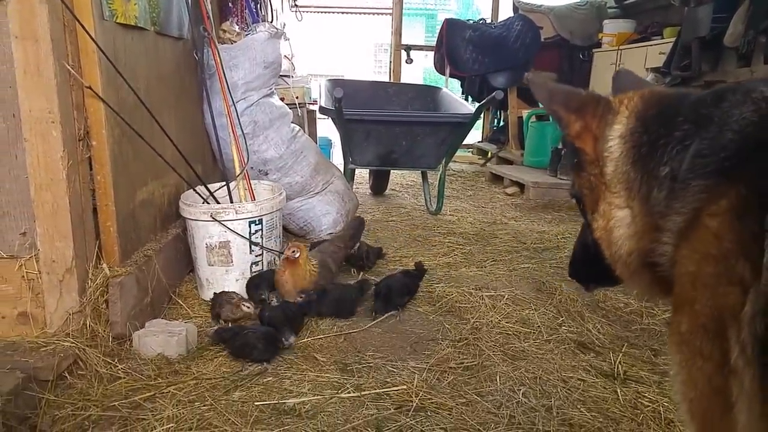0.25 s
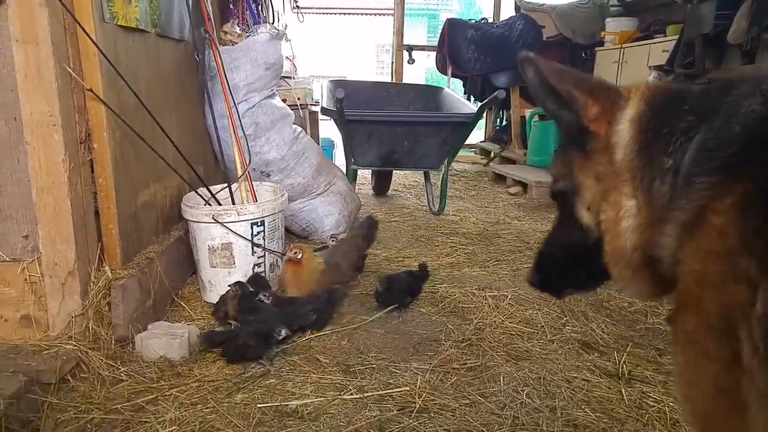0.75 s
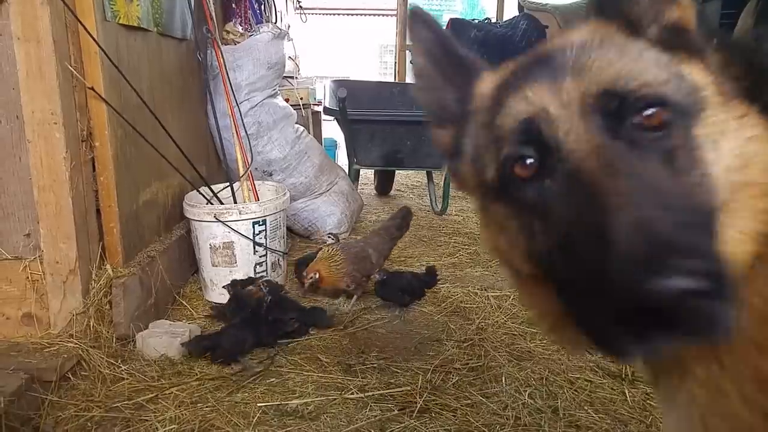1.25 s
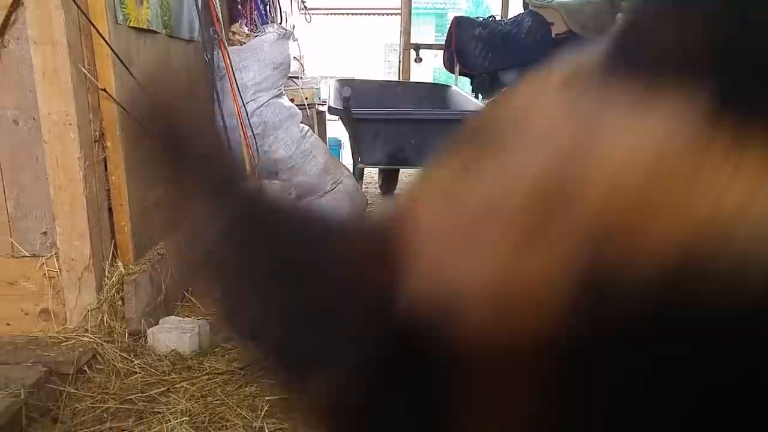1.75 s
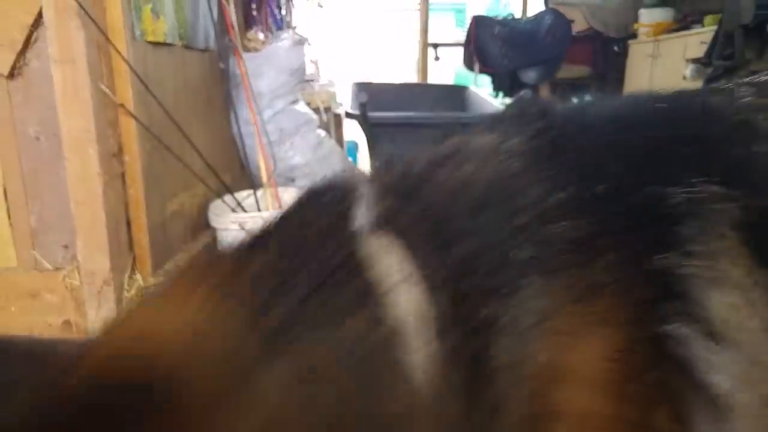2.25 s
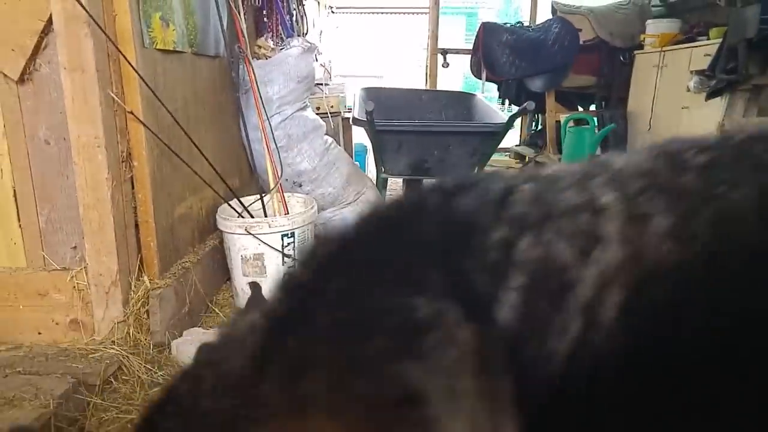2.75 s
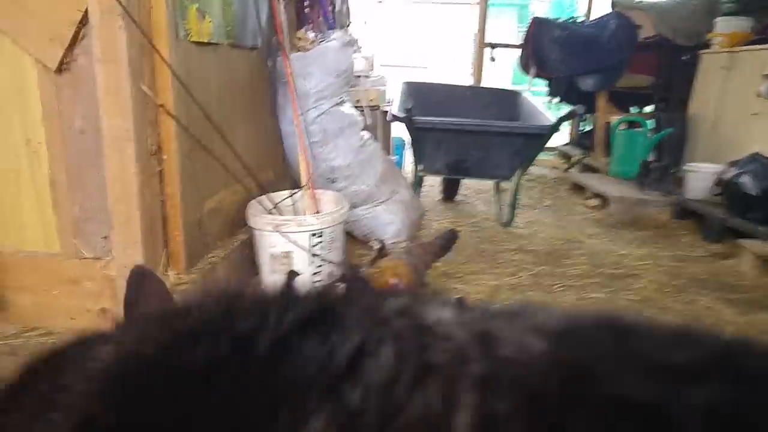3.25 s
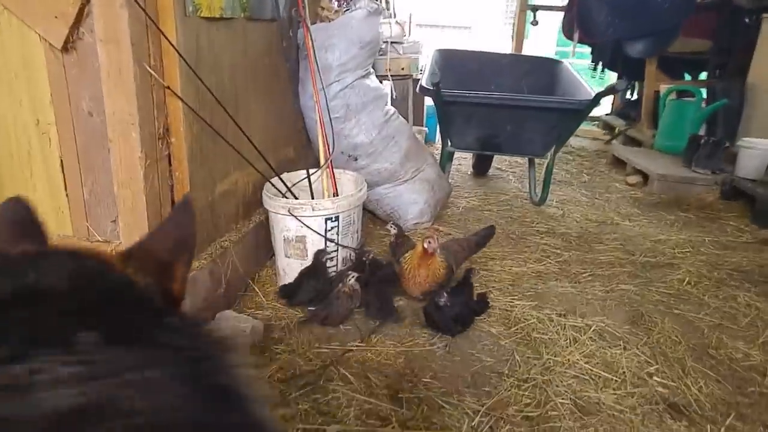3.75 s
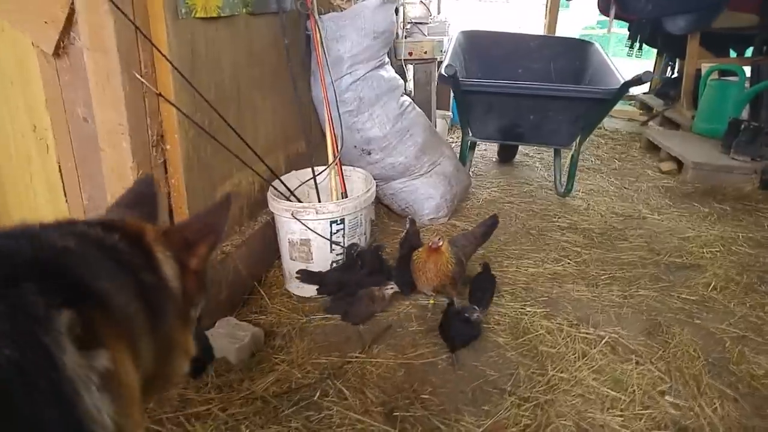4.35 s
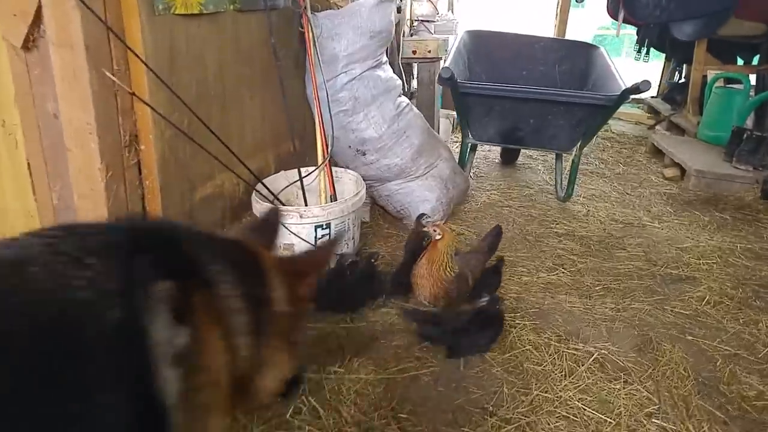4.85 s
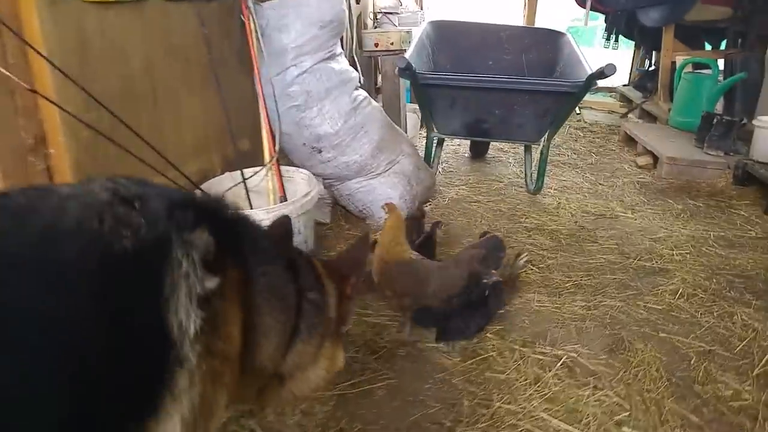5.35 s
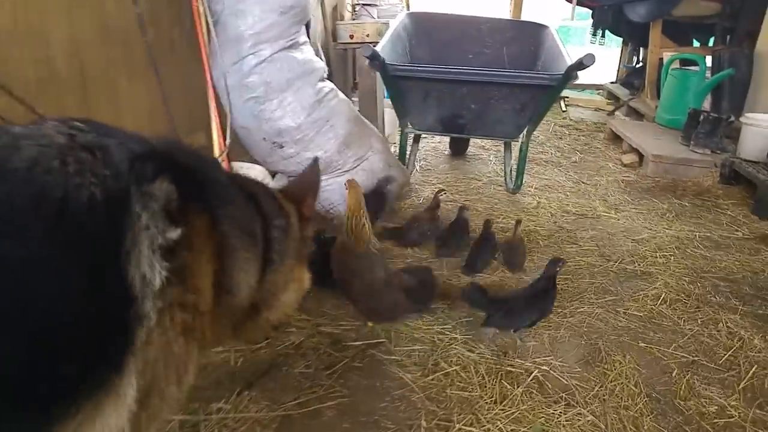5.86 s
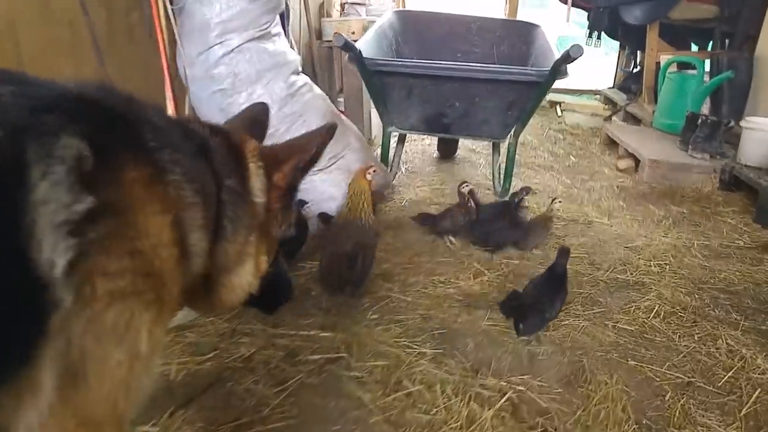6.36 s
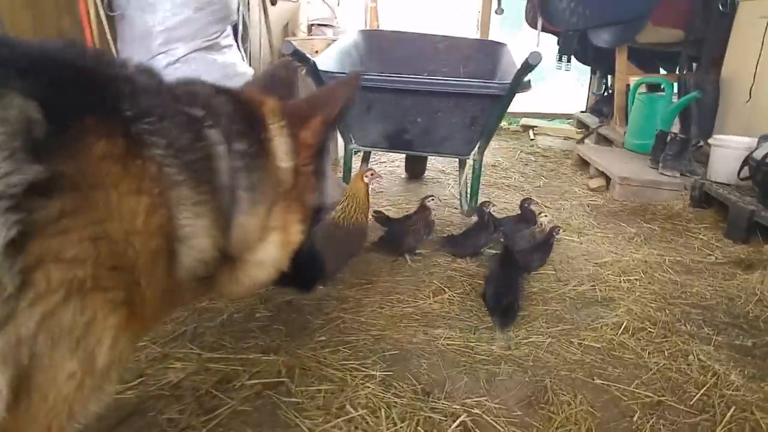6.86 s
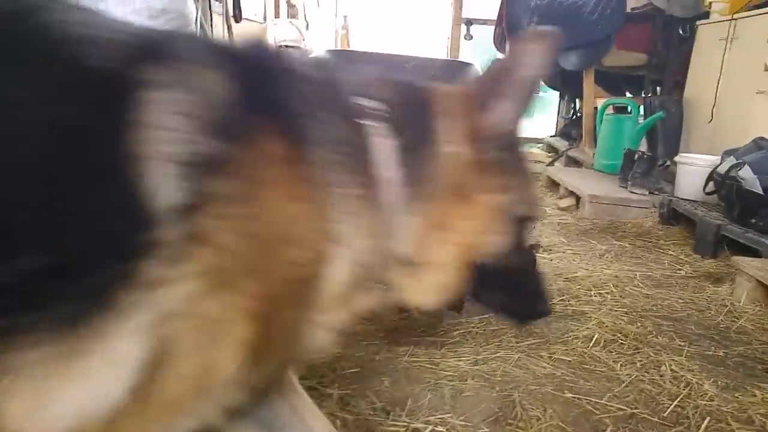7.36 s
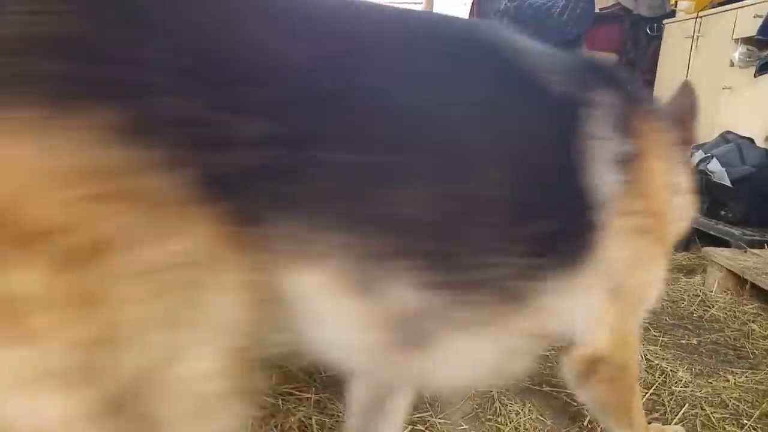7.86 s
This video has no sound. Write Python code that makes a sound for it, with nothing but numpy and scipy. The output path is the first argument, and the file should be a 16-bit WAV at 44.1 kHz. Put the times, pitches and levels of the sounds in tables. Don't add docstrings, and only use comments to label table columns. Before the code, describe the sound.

Thin down-bending chick whistles, crackling straw and handling knocks, a distant rough crow midway, then throaty hen clucks, startled squawks and a faint growl.

```python
import sys
import numpy as np
from scipy import signal
from scipy.fft import rfft, irfft
from scipy.io import wavfile

SR = 44100
rng = np.random.default_rng(int(sys.argv[2]) if len(sys.argv) > 2 else 0)


def invert_db(x):
    u = np.asarray(x, float) / 20
    return 10 ** u


def output_pcm(signal):
    pcm = np.clip(np.atleast_2d(signal).T, -1, 1) * 32767
    wavfile.write(sys.argv[1], SR, np.round(pcm).astype(np.int16))


N = 357210

SIDE_LEAD = 42
SHED_T60_S, YARD_T60_S = 0.17, 0.5

# time in seconds, level in dB.
AIR_LEVEL = [
    (0.0, -63),
    (5.3, -58.5),
    (8.1, -58.5),
]
# frequency in Hz, level in dB per Hz.
AIR_COLOUR = [(36, 6.5), (70, 2), (170, -4.5), (600, 3.5), (1600, -13), (2600, -7.5), (7000, -17.5),
              (14000, -31)]
# frequency in Hz, shared part from 0 to 1.
AIR_SHARED = [(60, 0.69), (500, 0.067), (1500, 0.034), (5000, 0.056), (12000, 0.64)]
# frequency in Hz, left minus right in dB.
AIR_PAN = [(60, -9.5), (240, -0.5), (950, 0.5), (3770, -7.5), (15000, 2)]
# time in seconds, level in dB.
SCRATCHING = [(0, -66), (.6, -60.5), (1.1, -59.5), (1.95, -57), (2.15, -63), (2.7, -61), (3.6, -56),
              (4.5, -56.5), (5.5, -57.5), (6.1, -52), (6.5, -60.5), (7.5, -59), (8.1, -59.5)]
# time of the peak in seconds, level in dB, dying time in seconds.
STEPS = [(1.24, -44.5, 0.03), (1.52, -52.5, 0.069), (1.79, -50.5, 0.044), (3.3, -55.5, 0.037),
         (3.43, -51, 0.11), (4.031, -53, 0.047), (4.48, -56, 0.078), (4.56, -55, 0.089),
         (4.76, -52.5, 0.057), (5.08, -59, 0.056), (5.64, -48, 0.12), (5.92, -50.5, 0.093),
         (7.019, -49.5, 0.026), (7.141, -50.5, 0.11), (7.25, -61, 0.029), (7.365, -59, 0.04),
         (7.4, -49, 0.045), (7.49, -54.5, 0.044), (7.87, -58, 0.19), (7.72, -51.5, 0.048),
         (8.05, -55.5, 0.27)]
# frequency in Hz, level in dB per Hz.
STRAW_COLOUR = [(1500, -7.5), (2750, -7), (3340, -5.5), (4890, 0.5), (7090, 4.5), (10000, -4), (14200, -5),
                (15300, -23.5)]
# time in seconds, lead of the left port in samples, left minus right in dB.
BROOD_PLACE = [
    (0, 32.6, -10.5),
    (2.7, 37, -7.5),
    (3.1, 4.9, -7),
    (5.5, 12.16, -0.5),
    (8.1, 8, 6),
]
# start in seconds, length in seconds, top pitch in Hz, end pitch
# in Hz, level in dB.
PEEPS = [(.095, 0.076, 5300, 3700, -50.5), (.12, 0.04, 4160, 3330, -50.5), (.205, 0.041, 4260, 4000, -52.5),
         (.225, 0.071, 5820, 5930, -55), (.315, 0.028, 5140, 5040, -54.5), (.34, 0.048, 5600, 5250, -60),
         (.365, .055, 4950, 4370, -53), (.338, 0.045, 4390, 3540, -51), (.43, 0.049, 4400, 3000, -47.5),
         (.432, 0.028, 4740, 4180, -48.5), (.52, 0.063, 4420, 4220, -49), (.515, 0.068, 4230, 3830, -55),
         (.562, 0.059, 4500, 2870, -43), (.56, .035, 5170, 4970, -57), (.568, 0.039, 4800, 4300, -47.5),
         (.742, 0.066, 4460, 2890, -46.5), (.745, 0.042, 4730, 4250, -48), (1.008, 0.036, 3680, 2650, -64),
         (1.054, 0.038, 3740, 2650, -51.5), (1.165, 0.046, 5060, 4030, -56), (1.185, 0.04, 3870, 3030, -50),
         (1.305, 0.046, 4320, 3080, -45), (1.32, 0.032, 5250, 5170, -50), (1.39, 0.035, 4660, 3630, -46.5),
         (1.435, 0.022, 4410, 4120, -53), (1.45, 0.062, 4190, 3800, -48), (1.455, 0.022, 4670, 4540, -52),
         (1.535, 0.075, 4830, 3000, -47.5), (1.615, 0.044, 5050, 4950, -54),
         (1.615, 0.05, 4420, 3610, -49.5), (1.7, 0.032, 4300, 3900, -51.5),
         (1.785, 0.045, 5130, 5040, -52.5), (1.79, 0.07, 4240, 3760, -54.5),
         (1.86, 0.042, 4580, 4180, -51.5), (1.865, 0.042, 4170, 4020, -53),
         (1.925, 0.0071, 3370, 3030, -50.5), (2.02, 0.11, 4530, 3400, -58), (2.035, 0.057, 5360, 4500, -55),
         (2.18, 0.072, 4690, 3720, -54),
         (2.236, 0.021, 3060, 3080, -52), (2.317, 0.077, 4690, 3150, -49),
               (2.484, 0.054, 4060, 3570, -53), (2.5, 0.032, 4280, 4000, -52),
               (2.643, .055, 4200, 3710, -47.5), (2.656, 0.078, 4400, 3170, -55.5),
               (2.665, 0.031, 3600, 2900, -61), (2.839, 0.027, 3700, 3050, -52),
               (2.844, .088, 4110, 3020, -50), (3.319, 0.042, 4850, 4000, -45.5),
               (3.447, .045, 4950, 3950, -47), (3.756, .055, 4250, 3850, -45),
               (3.92, 0.034, 3880, 3560, -49), (3.954, 0.047, 5070, 4000, -46),
               (3.943, 0.038, 4310, 3830, -42.5), (4.01, 0.038, 4210, 4070, -51),
               (4.128, 0.072, 4370, 3930, -44), (4.15, 0.033, 5080, 4300, -52),
               (4.265, 0.042, 4790, 4600, -52), (5.63, 0.023, 3760, 3400, -49),
               (5.771, 0.0084, 3960, 4060, -50), (5.81, 0.0095, 4050, 3930, -43.5),
               (5.812, 0.017, 3670, 2830, -45), (5.888, 0.053, 4010, 3870, -55),
               (5.896, 0.035, 4010, 2270, -42), (8.022, 0.042, 4150, 3200, -46.5)]
# start in seconds, length
# in seconds, top pitch in Hz, end pitch in Hz, level in dB.
SHAKY_PEEPS = [(6.432, 0.0178, 3400, 2860, -55), (6.62, 0.016, 3300, 3000, -53),
               (6.65, 0.037, 4350, 4500, -54), (6.76, 0.039, 3950, 3880, -59),
               (6.51, 0.062, 4500, 3100, -56), (6.55, 0.024, 4550, 4400, -45.5),
               (6.575, .035, 4350, 3660, -53), (6.622, 0.027, 3800, 2700, -51),
               (6.675, 0.041, 4650, 3480, -51), (6.76, 0.059, 4250, 4160, -54.5),
               (6.785, 0.046, 5150, 4060, -55), (6.836, 0.033, 3750, 2820, -46),
               (7.87, .05, 5430, 5100, -54.5), (7.95, .045, 4140, 3860, -50),
               (6.94, 0.05, 4250, 4080, -52.5), (7.01, 0.029, 4300, 3700, -61),
               (7.2, 0.054, 3600, 3000, -60), (7.265, 0.035, 4550, 4150, -50.5),
               (7.27, 0.046, 4850, 3460, -49), (7.275, 0.037, 3650, 3010, -50),
               (7.46, .03, 5250, 5200, -57), (7.475, 0.032, 4500, 3720, -52),
               (7.515, 0.021, 3600, 2820, -46), (7.73, 0.017, 3700, 3680, -50),
               (7.74, 0.019, 3100, 2720, -49),
               (1.012, 0.027, 3680, 2710, -49.5), (1.058, 0.032, 3800, 2780, -50),
                 (4.52, 0.042, 4100, 3200, -48.5), (4.594, 0.041, 4250, 3100, -50),
                 (4.658, 0.05, 4600, 3600, -51), (4.666, 0.022, 3850, 3700, -48.5),
                 (4.7, .045, 4300, 4100, -52), (4.72, 0.02, 3300, 2850, -51),
                 (4.795, 0.044, 4250, 3200, -46.5), (4.802, 0.055, 5150, 4400, -50.5),
                 (4.814, 0.067, 4500, 3900, -53), (4.854, 0.03, 5100, 4400, -56),
                 (4.86, 0.064, 4150, 3600, -51), (4.882, .03, 3300, 2750, -55),
                 (4.982, .025, 4900, 3760, -54), (5.009, 0.03, 3500, 2600, -50.5)]
# start in seconds, peak level in dB, thump level in dB, brightness in dB per octave.
KNOCKS = [(.213, -49, 7, -12), (.431, -43, 7, 1), (0.936, -49, 7, 1), (1.657, -26.5, -28, 2),
          (1.742, -33.5, 0, 1.5), (2.123, -50, 13, -1), (2.159, -39.5, -6, 4), (3.95, -36, 1, 1.5),
          (4.377, -34.5, -23, 6), (4.485, -39, 9, 18), (4.622, -43, 5, 2), (4.74, -35.5, 5.5, 6),
          (5.308, -29, -40, -1), (5.431, -36, 8.5, 7), (7.36, -41, -27, -5), (7.719, -34, 8, 1.5),
          (7.803, -27, -5.5, -6.5), (7.923, -38.5, 0, 0)]
# start in seconds, peak level in dB, thump level in dB, brightness in dB per octave.
PAWS = [(2.039, -49, -16, -3), (2.349, -51.5, 14, -12), (2.802, -38.5, -2, -13), (2.839, -48, 11, 8),
        (2.918, -50, -12, 12), (3.534, -50.5, -16, -1), (4.91, -49.5, -2, 4), (5.271, -48, -9, 4),
        (3.717, -46.5, -23, -6)]
# pitch in Hz, level in dB, time to fall 60 dB in seconds.
CASING = [(400, -3, 0.014), (688, 9.5, 0.012), (1320, 5.5, 0.0058), (2370, 0, 0.0043), (4000, -7.5, 0.0066)]
# start in seconds, length in seconds, start pitch in Hz, level in dB.
YARD_CALLS = [(0.36, 0.066, 2685, -69.5), (0.704, 0.05, 2630, -66), (.77, 0.017, 2430, -64),
              (6.448, 0.037, 2350, -77), (1.117, 0.09, 1897, -66), (1.365, 0.2, 2743, -61),
              (1.486, 0.033, 3030, -70), (1.799, 0.31, 2120, -65), (2.108, 0.2, 2790, -60),
              (2.474, 0.22, 2300, -68), (2.69, 0.061, 1600, -72), (5.06, 0.041, 2630, -66)]
# start in seconds, peak level in dB, left minus right in dB.
SNAPS = [(0.8859, -54, -4.5), (1.244, -30, 6), (1.8956, -39, -1.5), (1.9926, -31, -6), (2.2416, -33.5, -6),
         (2.2657, -40, -5), (2.367, -32, 4), (2.4652, -31, -6), (2.513, -30, -4), (3.4118, -27, -2.0),
         (3.6005, -33.5, -5.0), (3.715, -42, -5.5), (4.7433, -40, 0.5), (5.41, -37, 3), (5.5543, -34, 5),
         (5.8197, -33, 2.0), (5.911, -29, 5), (6.997, -33, -6), (7.1365, -29, 9), (7.3637, -34, 1),
         (7.3983, -37, 10), (7.4953, -36, 4), (7.7039, -42, 6.5), (7.9234, -24.5, 19), (7.974, -31, 11),
         (1.39, -51, -3), (1.955, -36, -5), (8.018, -42, 3)]
# time in seconds, level in dB.
SCREECH_LEVEL = [(2.76, -46.5), (2.95, -55.5), (3.5, -41.5), (3.82, -35.5), (3.971, -48.5), (4.04, -41.5),
                 (4.17, -38.5), (4.399, -51.5)]
# frequency in Hz, width in Hz, level in dB.
SCREECH_BANDS = [(2100, 680, -5.5), (2570, 160, -9.5), (3720, 1300, -1), (4950, 770, -3),
                 (5250, 300, -11.5), (3525, 120, -24)]
# time in seconds, pitch in Hz, level in dB, hoarseness from 0 to 1.
CROW = [
    [(3.02, 1192, -47, 0), (3.08, 1265, -44.5, 0.27), (3.17, 1266, -44, 0.61), (3.3, 1320, -56, 0.9),
     (3.45, 1370, -43.5, 0.98)],
    [(3.29, 1393, -47.5, 0.8), (3.33, 1594, -43, 0.54), (3.47, 1582, -53, 0.4)],
    [(3.45, 1343, -42, 0.52), (3.6, 1369, -46, 0), (3.68, 1405, -41.5, 0.57), (3.82, 1406, -46, 1.05),
     (3.95, 1350, -73, 0.95)],
    [(3.48, 1328, -42, 0.35), (3.6, 1342, -39, 0.26), (3.7, 1355, -56, 0.1)],
    [(3.48, 1430, -41, 0.29), (3.63, 1418, -44.5, 0.44), (3.68, 1552, -44.5, 0.62), (3.85, 1480, -51, 1)],
    [(4.07, 1350, -49, 0.44), (4.16, 1376, -50.5, 0.24), (4.22, 1335, -44, 0.2), (4.3, 1334, -39.5, 0.13),
     (4.46, 1309, -47, 0.31), (4.55, 1310, -56, 0.77), (4.78, 1320, -71, 0.54)],
]
# multiple of the pitch, level in dB.
CROW_OVERTONES = [(1, -13.5), (2, -1), (3, -21), (4, -17.5), (5, -29)]
# multiple of the pitch, level in dB.
CROW_END_OVERTONES = [(1, -20.5), (2, 1.5), (3, -28), (4, -39)]
# time in seconds, pitch in Hz, level in dB, hoarseness from 0 to 1.
RIVAL = [
    [(3.0, 1016, -49.5, 0.5), (3.15, 982, -52.5, 0.61), (3.3, 1017, -52, 0.7)],
    [(3.45, 1010, -51, 0.4), (3.57, 1069, -72, 0), (3.75, 986, -56, 0.18), (4.02, 1061, -58, 0.63)],
    [(3.43, 1150, -43, 0.26), (3.55, 1160, -62, 0.25), (3.9, 1162, -44, 0.54)],
    [(4.06, 1060, -41.5, 0.52), (4.42, 983, -71, 0.08)],
]
# multiple of the pitch, level in dB.
RIVAL_OVERTONES = [(1, -10.5), (2, -8.5), (3, -17), (4, -24), (5, -14)]
# start in seconds, length in seconds, pulses in Hz, level in dB, beak opening from 0 to 1.
CLUCKS = [(4.42, 0.43, 298.6, -49.5, 1), (5.229, 0.055, 331, -37.5, 0.67), (5.313, 0.06, 350, -40, 0.67),
          (5.452, 0.13, 313.5, -35.5, 1), (5.675, 0.11, 330, -48, 0.3), (5.781, 0.086, 332, -37.5, 0.5),
          (7.696, 0.077, 333.5, -44.5, 0.1), (6.045, 0.055, 389.4, -39.5, 0.74),
          (6.131, 0.028, 400, -44, 0.83), (5.912, 0.052, 350.6, -44, 0.42),
          (6.277, 0.077, 346, -47.5, 0.73), (6.332, 0.055, 350.6, -37, 0.6), (6.712, 0.069, 365, -36, 0.08)]
# frequency in Hz, width in Hz, level in dB with the beak shut.
HEN_THROAT = [(350, 145, 9), (653, 305, 8.5), (1196, 450, -9.5)]
# start in seconds, length in seconds, pitch in Hz, level in dB, octave overtone in dB.
SQUAWKS = [
    (5.049, 0.015, 1980, -40.5, -5.5),
    (5.464, 0.025, 2297, -45, 1.5),
    (5.609, 0.039, 2282, -37.5, -4.5),
    (5.613, 0.03, 2547, -35, -7),
    (5.915, 0.027, 1900, -33.5, -20),
    (5.923, 0.028, 2350, -34.5, -19),
    (6.027, 0.081, 2100, -44, -11),
]
# time in seconds, pulses in Hz, level in dB.
GROWL = [
    (5.3, 198.3, -82),
    (5.4, 196.7, -50.5),
    (5.6, 200, -54.5),
    (5.85, 208.3, -51),
    (6.15, 202, -69),
]


def in_time(rows):
    s, *columns = np.transpose(rows)
    return [np.interp(np.arange(N) / SR, s, c) for c in columns]


def at_hz(points, hz):
    point_hz, value = np.transpose(points)
    return np.interp(np.log(hz), np.log(point_hz), value)


def rms_one(x):
    return x / np.sqrt(np.mean(x ** 2) + 1e-20)


def drift(rate_hz, size=N):
    r = np.exp(-2 * np.pi * rate_hz / SR)
    settle = 8000
    slow = signal.lfilter([1], [1, -2 * r, r * r], rng.standard_normal(size + settle))
    return rms_one(slow[settle:])


def resonance(x, hz, width):
    r = np.exp(-np.pi * width / SR)
    feedback = [1, -2 * r * np.cos(2 * np.pi * hz / SR), r * r]
    return signal.lfilter([(1 - r * r) / 2, 0, (r * r - 1) / 2], feedback, x)


def band(low, high, order):
    return signal.butter(order, [low, high], "band", fs=SR, output="sos")


def swing(hz):
    return 2 * np.pi * np.cumsum(hz) / SR


def add(track, s, sound):
    at = round(s * SR)
    track[..., at:at + sound.shape[-1]] += sound[..., :N - at]


def ports(x, lead, pan_db):
    late = np.interp(np.arange(N) - lead, np.arange(N), x)
    return np.array([x * invert_db(pan_db / 2), late * invert_db(-pan_db / 2)])


def room(x, t60):
    t = np.arange(SR // 2) / SR
    echoes = rng.standard_normal((2, len(t))) * invert_db(-60 * t / t60) * (t > .004)
    echoes = echoes / np.sqrt(np.sum(echoes ** 2) / 2)
    return signal.fftconvolve(x[None], echoes, axes=1)[:, :N]


def murmur(patchy_db=1.6, speed_hz=12.6):
    sources = rng.standard_normal((2, 3, N))
    edges = 30 * 2 ** np.arange(0, 9.6, .5)
    together = drift(speed_hz / 4)
    out = 0
    for k, (low, high) in enumerate(zip(edges, edges[1:])):
        hz = np.sqrt(low * high)
        if hz < AIR_COLOUR[0][0]:
            continue
        left, right, both = signal.sosfilt(band(low, min(high, .45 * SR), 2), sources[k % 2])
        shared = np.clip(at_hz(AIR_SHARED, hz), 0, 1)
        common = np.array([both, np.roll(both, SIDE_LEAD)])
        pair = np.sqrt(shared) * common + np.sqrt(1 - shared) * np.array([left, right])
        side_db = at_hz(AIR_PAN, hz) * np.array([[.5], [-.5]])
        flicker_db = patchy_db * (together + drift(speed_hz))
        out = out + pair * invert_db(at_hz(AIR_COLOUR, hz) + side_db + flicker_db)
    return rms_one(out)


def air():
    db, = in_time(AIR_LEVEL)
    hum_hz, hum_width, hum_db = 67, 24, -70
    hum = resonance(resonance(rng.standard_normal(N), hum_hz, hum_width), hum_hz, hum_width)
    return invert_db(db + 8.0) * murmur() + invert_db(hum_db) * ports(rms_one(hum), SIDE_LEAD, -13.5)


def trampling():
    t = np.arange(N) / SR
    db, = in_time(SCRATCHING)
    power = invert_db(db) ** 2
    for s, peak_db, dying in STEPS:
        rise_db = 350 * (s - t)
        fall_db = 8.5 * (np.maximum(t - s, 0) / dying) ** 2.4
        power = power + invert_db(peak_db - np.maximum(rise_db, fall_db)) ** 2
    return np.sqrt(power)


def straw():
    size = invert_db(2.7 * np.minimum(rng.exponential(1, (2, N)), 5))
    grains = (rng.random((2, N)) < 2500 / SR) * size
    crackle = (grains + 0.47) * rng.standard_normal((2, N))
    colour = invert_db(at_hz(STRAW_COLOUR, np.arange(N // 2 + 1) * SR / N + 1))
    clumps = invert_db(1.5 * drift(15.3))
    return trampling() * invert_db(4.5) * clumps * rms_one(irfft(rfft(crackle) * colour, N))


def whistles(rows, gain_db, second_db, twin_db, waver_db, scoop_hz, bend, swell_db=1.5, arch=0.012, shake=0.01):
    out = np.zeros(N)
    waver = invert_db(waver_db * np.tanh(drift(99)))
    tremble = 1 + shake * drift(196)
    for s, length, top_hz, end_hz, db in rows:
        t = np.arange(-.01, length + 0.0086, 1 / SR)
        top = arch * length
        rising = top_hz - scoop_hz * ((t - top) / (top + 0.00993)) ** 2
        bending = top_hz + (end_hz - top_hz) * (abs(t - top) / (length - top)) ** bend
        hz = np.where(t < top, rising, bending)
        phase = swing(hz * np.resize(tremble[round(s * SR):], len(t)))
        twin = invert_db(twin_db) * np.sin(1.2 * phase)
        tone = np.sin(phase) + invert_db(second_db) * np.sin(2 * phase) + twin
        level = invert_db(db + gain_db + swell_db * t / length)
        add(out, s - .01, level * signal.windows.tukey(len(t), .4) * tone)
    return out * waver


def open_peeps():
    return whistles(PEEPS, gain_db=3.0, second_db=-17.0, twin_db=-16, waver_db=3.5,
                    scoop_hz=333, bend=1.7, swell_db=-3.0, arch=0.1684)


def knocks():
    out = np.zeros((2, N))
    t = np.arange(SR // 8) / SR
    blows = [(*row, -83 - row[1]) for row in KNOCKS] + [(*row, 0.5) for row in PAWS]
    for s, db, thump_db, tilt_db, pan_db in blows:
        ring = np.zeros(len(t))
        for hz, g, t60 in CASING:
            luck = rng.uniform(-1, 1)
            octaves = np.clip(np.log2(hz / CASING[1][0]), 0, 1.4)
            level = invert_db(g + 2 * luck + tilt_db * octaves - 60 * t / t60)
            ring += level * np.sin(2 * np.pi * hz * (1 + 0.043 * luck) * t)
        attack_s = 0.00067 * invert_db(max(-30.5 - db, 0))
        ring = ring * np.minimum(t / attack_s, 1)
        sag = 70 * t + 1.3 * (1 - np.exp(-t / 0.0044))
        thump = invert_db(thump_db - 13.5 - 60 * t / 0.02) * np.sin(2 * np.pi * sag)
        far_side_db = np.minimum([[pan_db], [-pan_db]], 0)
        sides = invert_db(far_side_db - invert_db(-abs(pan_db)) * 4.5 + 15.0)
        add(out, s + 0.00188, invert_db(db) * sides * (ring / abs(ring).max() + thump))
    return out


def yard_calls():
    rise = 490
    rows = [(s, length, hz, hz + rise * length, db) for s, length, hz, db in YARD_CALLS]
    return whistles(rows, gain_db=7.5, second_db=-39.0, twin_db=-10, waver_db=7.5, scoop_hz=40, bend=1.15)


def snaps():
    out = np.zeros((2, N))
    t = np.arange(SR // 50) / SR
    for s, db, pan_db in SNAPS:
        burst = rng.standard_normal(len(t)) * invert_db(-60 * t / 0.003)
        crack = resonance(burst, 6600, 1700) + invert_db(-21.0) * signal.sosfilt(band(2500, 13000, 1), burst)
        sides_db = np.array([[pan_db], [-pan_db]]) / 2
        add(out, s, invert_db(db - 1.0 + sides_db) * crack / abs(crack).max())
    return out


def shaky_peeps():
    return whistles(SHAKY_PEEPS, gain_db=0.5, second_db=-34, twin_db=-16, waver_db=4.5,
                    scoop_hz=314, bend=1.35, swell_db=2.5, arch=0.077, shake=0.019)


def screech():
    start, end = SCREECH_LEVEL[0][0] - .05, SCREECH_LEVEL[-1][0] + 2.3
    db, = in_time([(start, -90), *SCREECH_LEVEL, (end, -90)])
    breath = np.zeros(N)
    for hz, width, g in SCREECH_BANDS:
        noise = resonance(resonance(rng.standard_normal(N), hz, width), hz, width)
        breath += invert_db(g + 1.9 * drift(28)) * rms_one(noise)
    return invert_db(db - 9.5) * breath


def voice(strands, overtones, wobble, hiss_hz):
    out = np.zeros(N)
    for rows in strands:
        s, hz, db, hoarse = np.transpose(rows)
        t = np.arange(s[0], s[-1], 1 / SR)
        rough = np.clip(np.interp(t, s, hoarse), 0, 1)
        phase = swing(np.interp(t, s, hz) * (1 + wobble * rough * drift(hiss_hz, len(t))))
        stack = np.zeros(len(t))
        for multiple, level in overtones:
            shaken = 1 - rough + rough * drift(hiss_hz, len(t))
            stack += invert_db(level) * shaken * np.sin(multiple * phase)
        add(out, s[0], invert_db(np.interp(t, s, db) + 7.0) * stack * signal.windows.tukey(len(t), .12))
    return out


def crowing():
    crow = invert_db(-0.5) * voice(CROW[:-1], CROW_OVERTONES, wobble=0.0151, hiss_hz=71.0)
    crow_end = voice(CROW[-1:], CROW_END_OVERTONES, wobble=0.0183, hiss_hz=53.3)
    rival = voice(RIVAL, RIVAL_OVERTONES, wobble=0.0294, hiss_hz=92)
    return crow + crow_end + rival + screech()


def hen():
    out = np.zeros(N)
    for s, length, hz, db, beak in CLUCKS:
        t = np.arange(0, length * 1.11, 1 / SR)
        cycles = np.cumsum(hz * (1 + (0.03 + 0.04 * beak) * drift(124, len(t)))) / SR
        uneven = invert_db(3 * np.tanh(drift(150, len(t))) + 3 * np.tanh(drift(40, len(t))))
        strong_weak = 1 + 0.39 * (-1) ** np.floor(cycles)
        pulses = np.diff(np.floor(cycles), prepend=0) * strong_weak
        breath = (0.072 + 0.047 * beak) * rng.standard_normal(len(t))
        source = uneven * (pulses + breath)
        call = np.zeros(len(t))
        for k, (f, width, g) in enumerate(HEN_THROAT):
            ringing = resonance(resonance(source, f, width), f, 2 * width)
            call += (-1) ** k * invert_db(g + 16.0 * beak * (k - 1)) * ringing
        swell = np.sin(np.pi * (t / t[-1]) ** 0.44) ** 2
        add(out, s, invert_db(db - 4.5) * rms_one(call) * swell)
    return out


def squawks():
    out = np.zeros(N)
    for s, length, hz, db, second_db in SQUAWKS:
        t = np.arange(0, length, 1 / SR)
        phase = swing(hz * (1 - 0.06 * np.exp(-t / 0.005) + 0.03 * drift(200, len(t))))
        rattle = invert_db(4 * np.tanh(drift(90, len(t))) - 12 * t / length)
        tone = np.sin(phase) + invert_db(second_db) * np.sin(2 * phase)
        add(out, s, invert_db(db) * rattle * signal.windows.tukey(len(t), .4) * tone)
    return out


def growl():
    hz, db = in_time(GROWL)
    cycles = np.cumsum(hz * (1 + 0.0039 * drift(30))) / SR
    pulses = np.diff(np.floor(cycles), prepend=0)
    lower = resonance(resonance(pulses, 1460, 300), 1900, 310)
    upper = resonance(resonance(pulses, 2480, 420), 3100, 630)
    return invert_db(db + 3 * drift(25)) * rms_one(lower - upper) * (db > -74)


def scene():
    lead, pan_db = in_time(BROOD_PLACE)
    brood = open_peeps() + invert_db(3.5) * hen() + invert_db(6.5) * squawks()
    hidden = shaky_peeps()
    near = ports(brood + invert_db(-3.5) * hidden, lead, pan_db) + snaps()
    near = near + invert_db(-1.5) * room(brood + hidden, SHED_T60_S)
    cocks = crowing()
    yard = yard_calls() + growl()
    far = invert_db(-2.0) * ports(cocks, 8.8, -15.0) + ports(yard, SIDE_LEAD, -4.0)
    far = far + invert_db(-1.5) * room(cocks + yard, YARD_T60_S)
    hits = knocks()
    hits = hits + invert_db(-27.5) * room(hits.sum(axis=0), SHED_T60_S)
    return near + far + hits + straw() + air()


def roll_off(x):
    return signal.sosfilt(signal.butter(12, 16270, fs=SR, output="sos"), x)


def record(dry):
    x = signal.sosfilt(signal.butter(7, 44, "high", fs=SR, output="sos"), dry)
    x = x - 0.89 * resonance(x, 508, 126)
    x = x - .85 * resonance(x, 7850, 260)
    x = signal.sosfilt(signal.cheby2(12, 60, 16300, fs=SR, output="sos"), x)
    return roll_off(x)


dry = scene()
out = record(dry)
output_pcm(out)
```